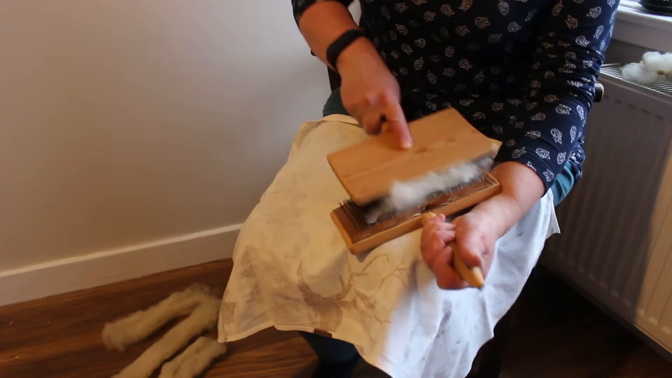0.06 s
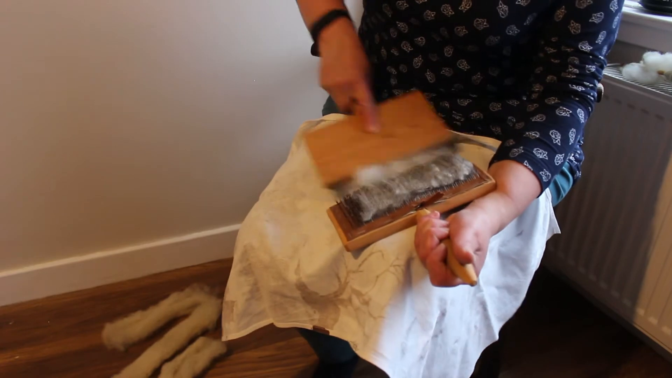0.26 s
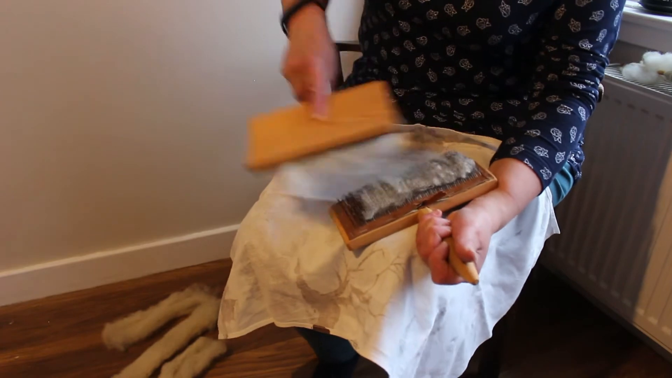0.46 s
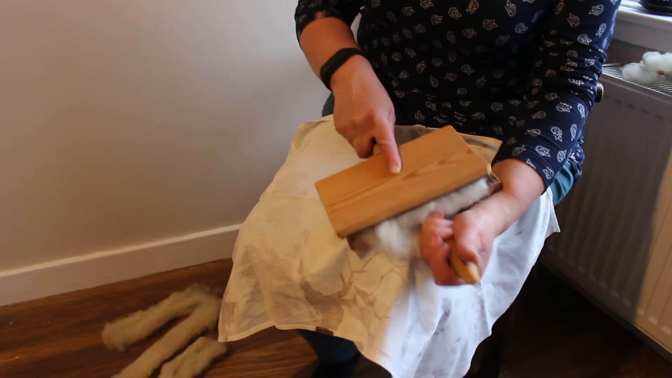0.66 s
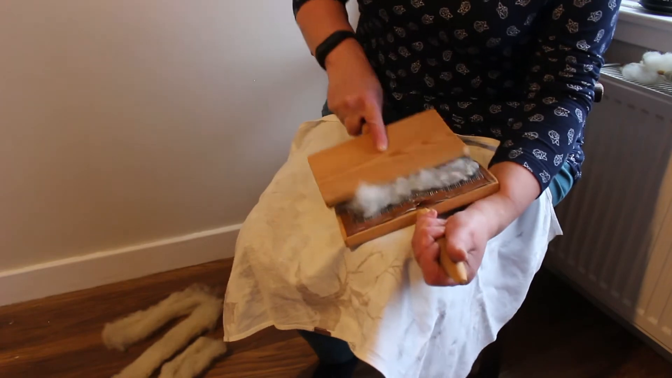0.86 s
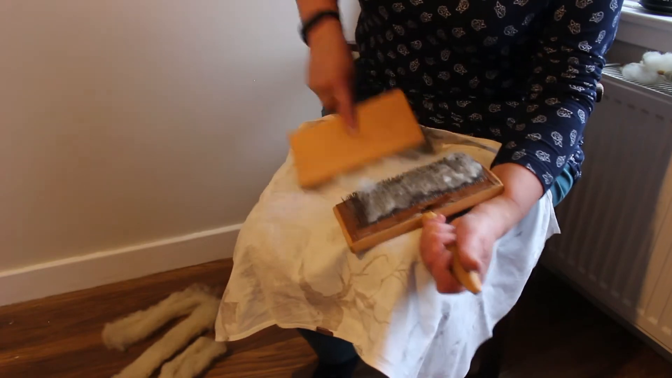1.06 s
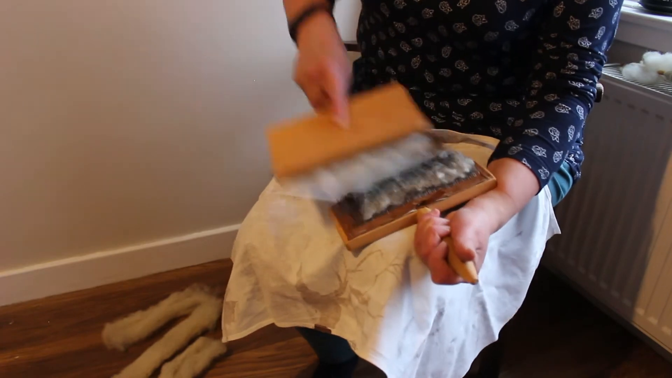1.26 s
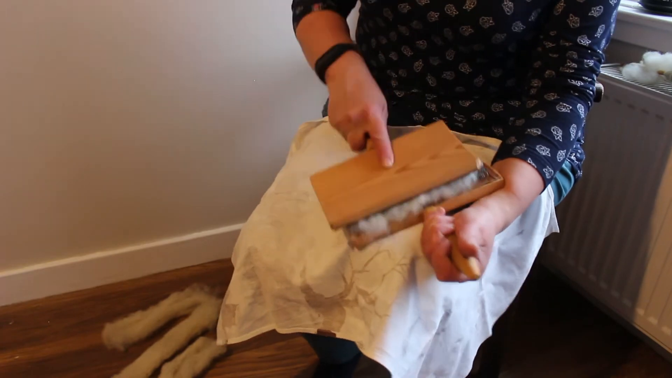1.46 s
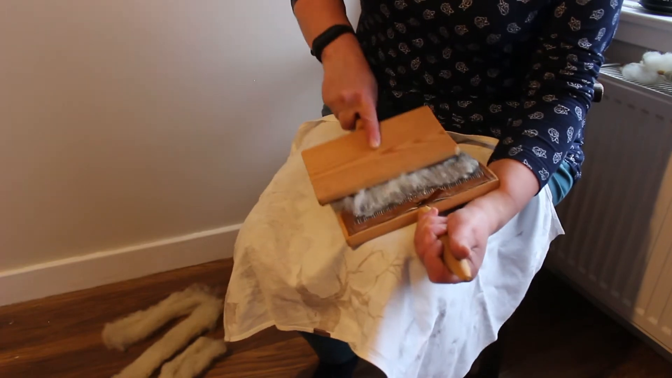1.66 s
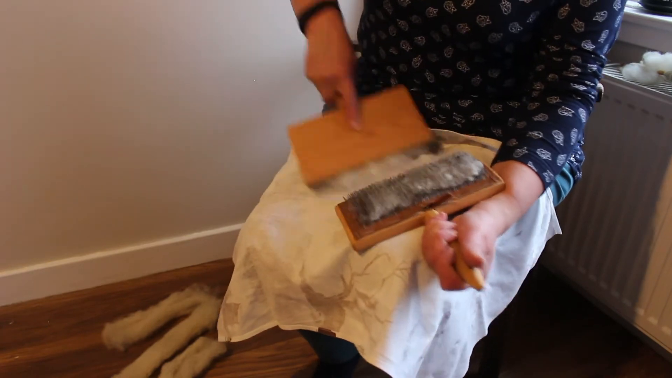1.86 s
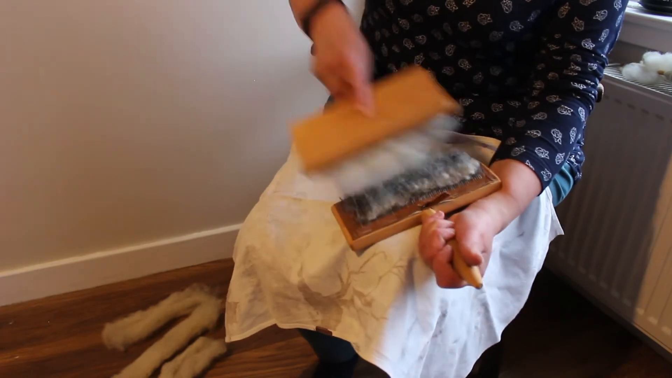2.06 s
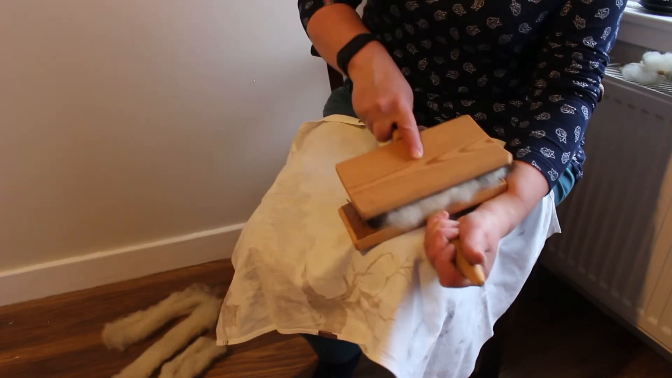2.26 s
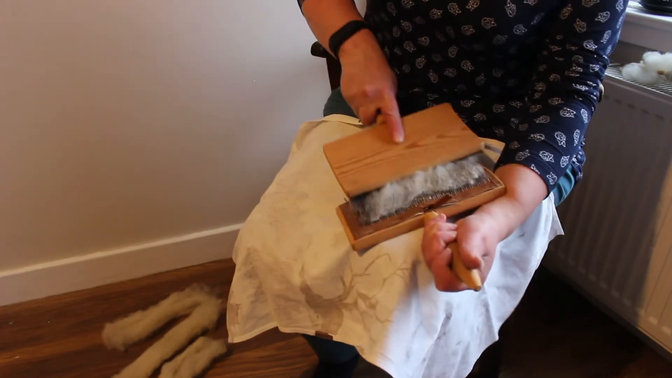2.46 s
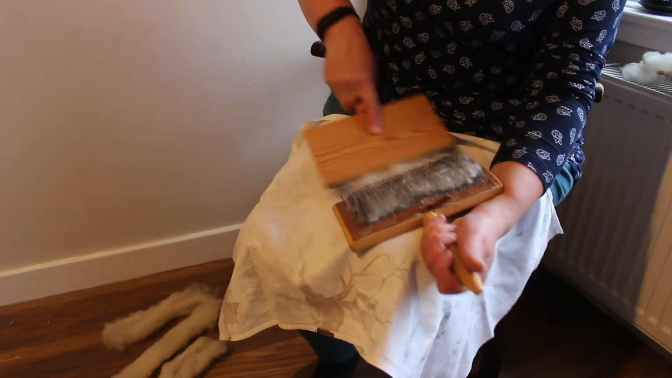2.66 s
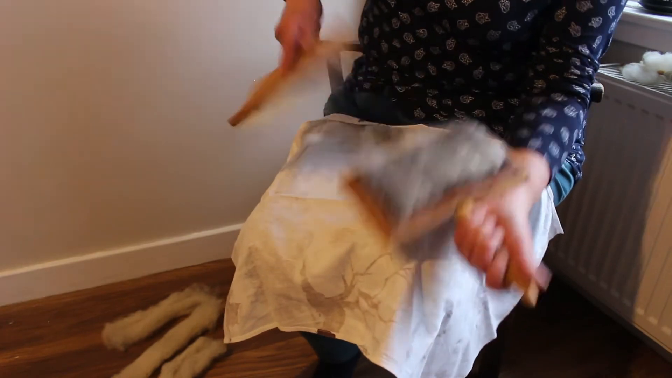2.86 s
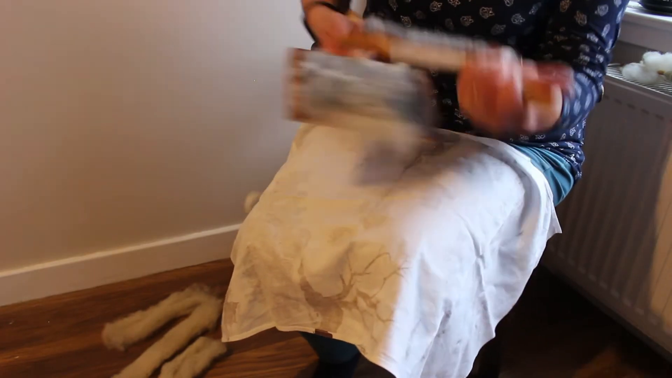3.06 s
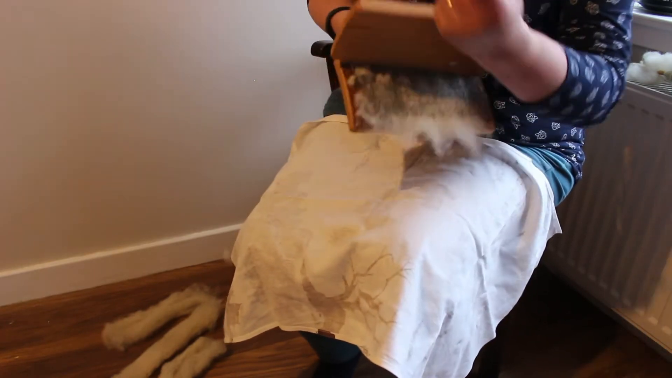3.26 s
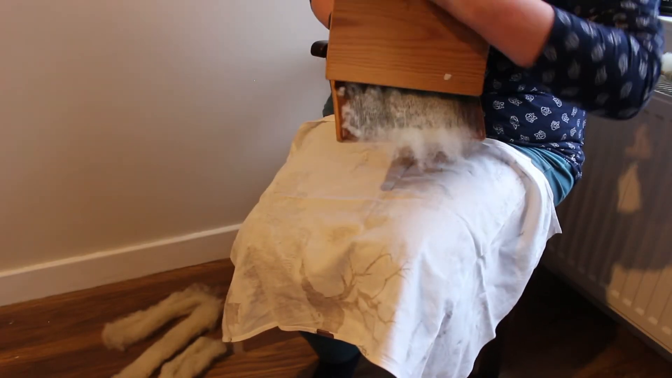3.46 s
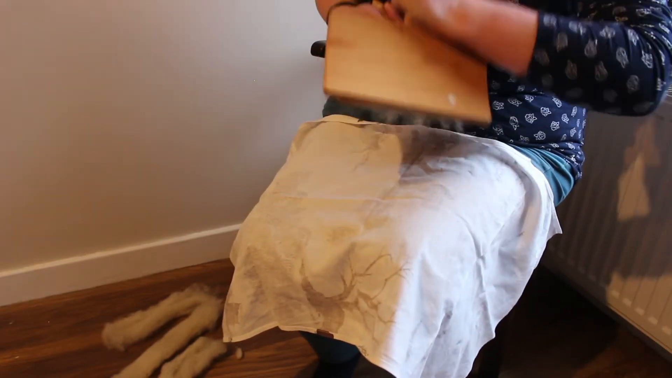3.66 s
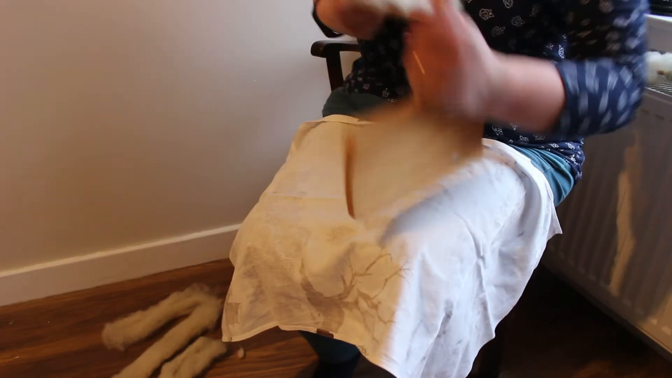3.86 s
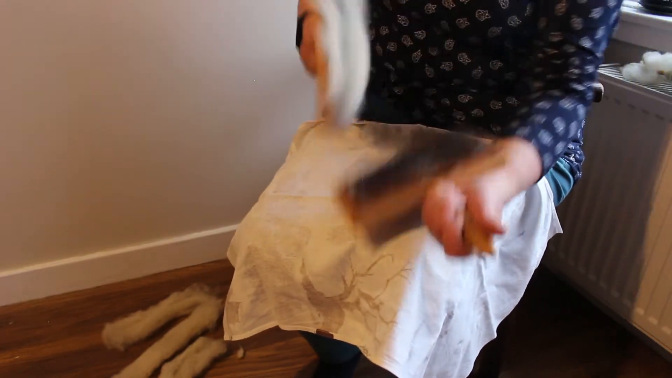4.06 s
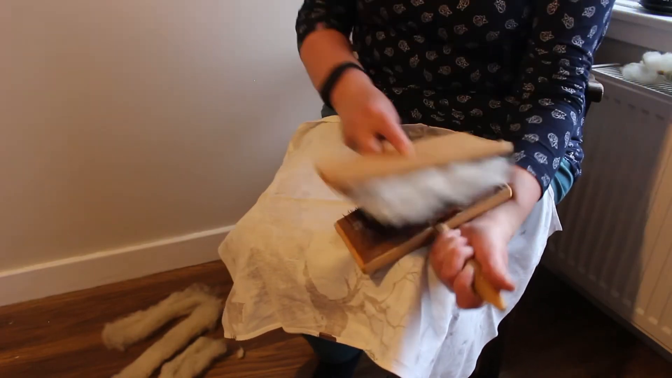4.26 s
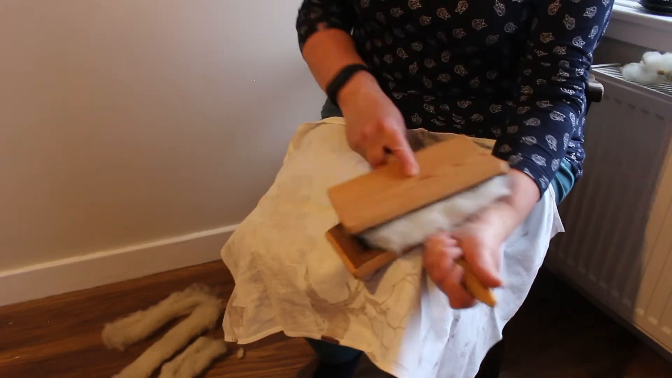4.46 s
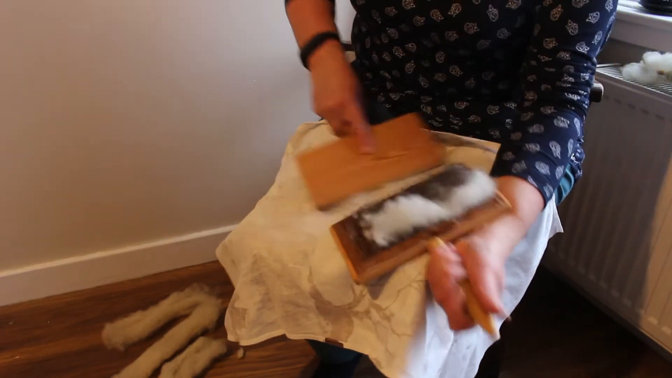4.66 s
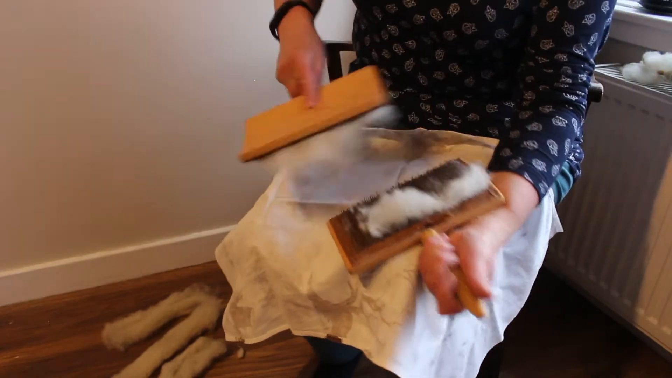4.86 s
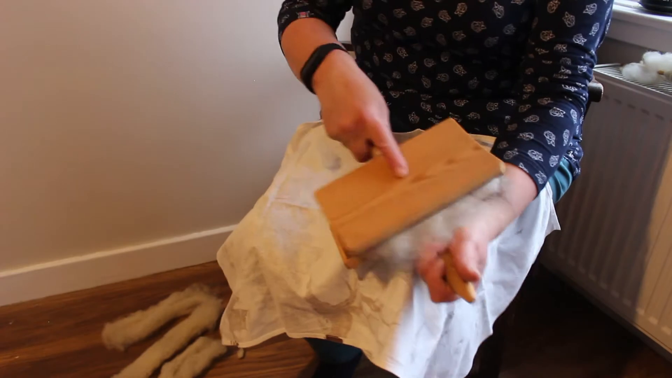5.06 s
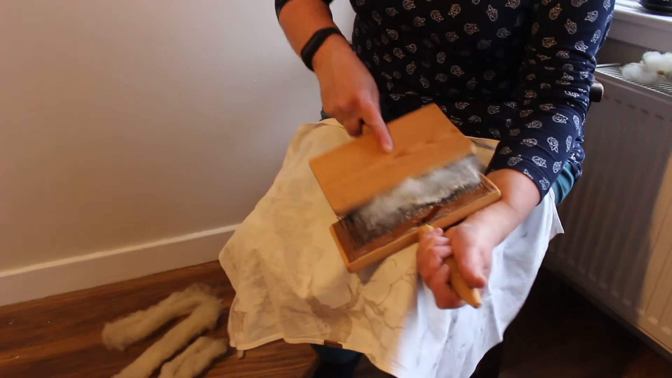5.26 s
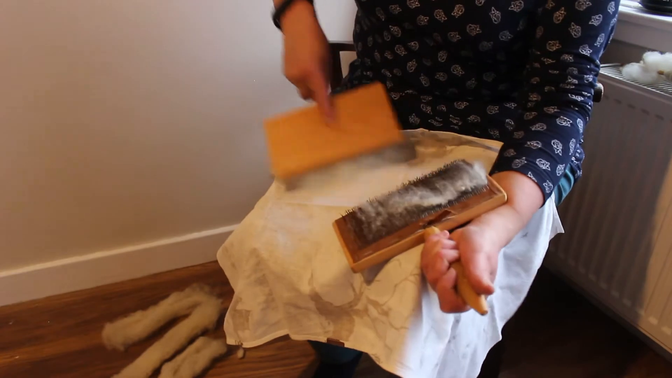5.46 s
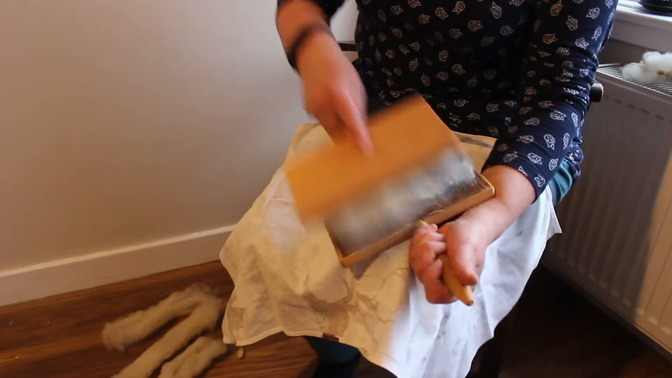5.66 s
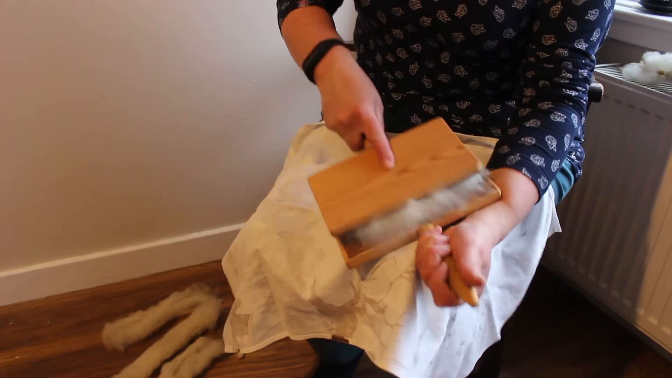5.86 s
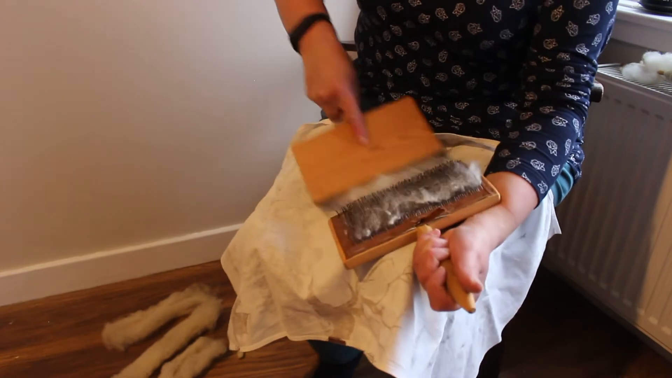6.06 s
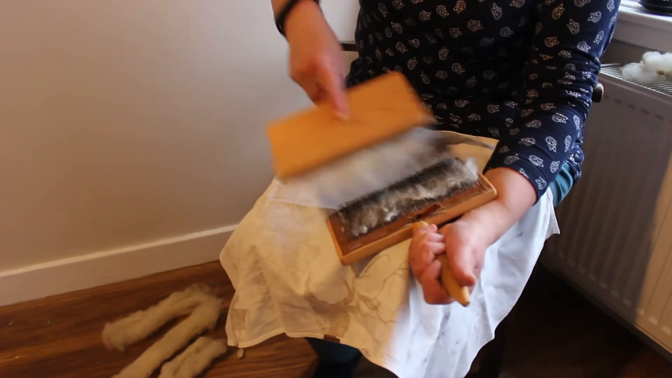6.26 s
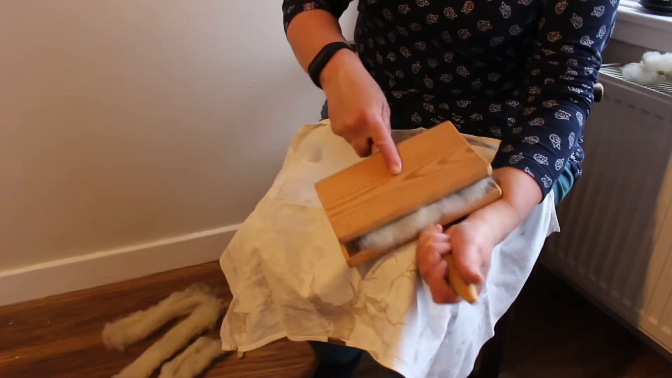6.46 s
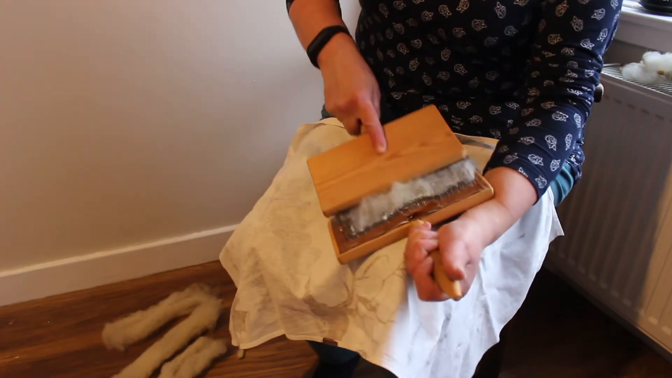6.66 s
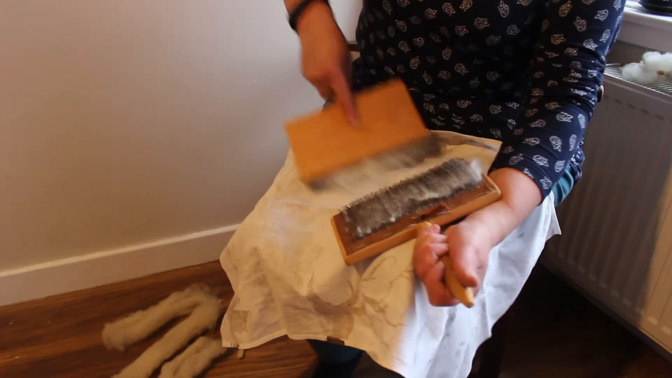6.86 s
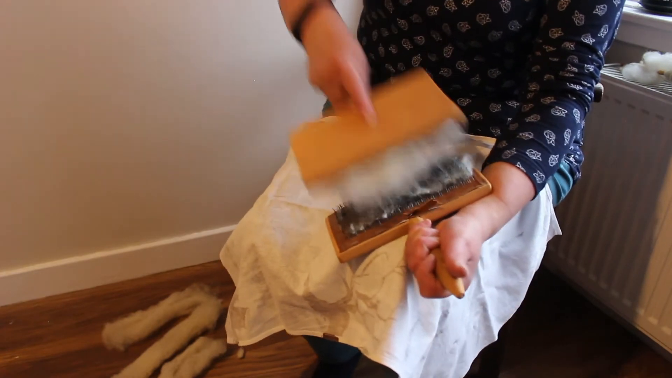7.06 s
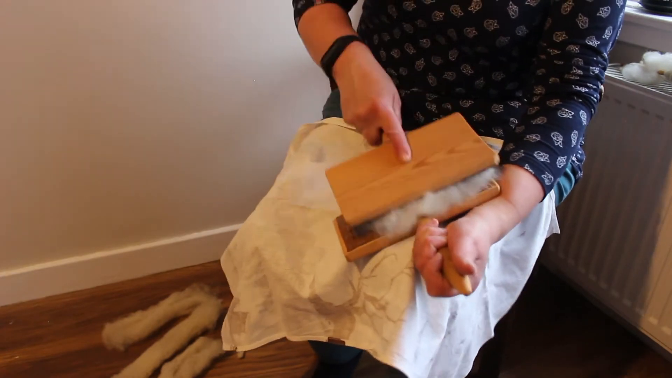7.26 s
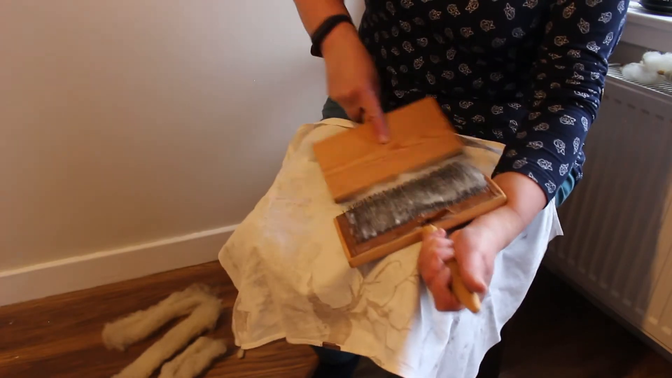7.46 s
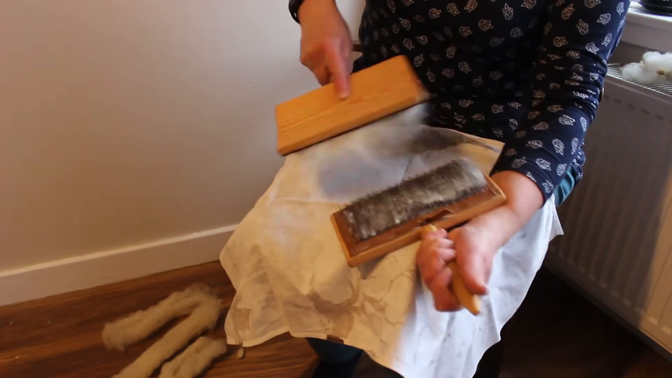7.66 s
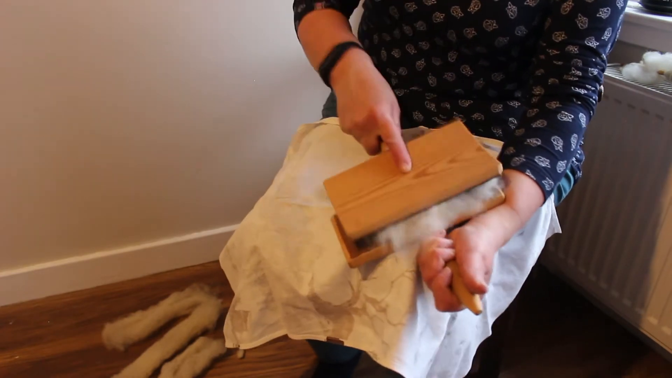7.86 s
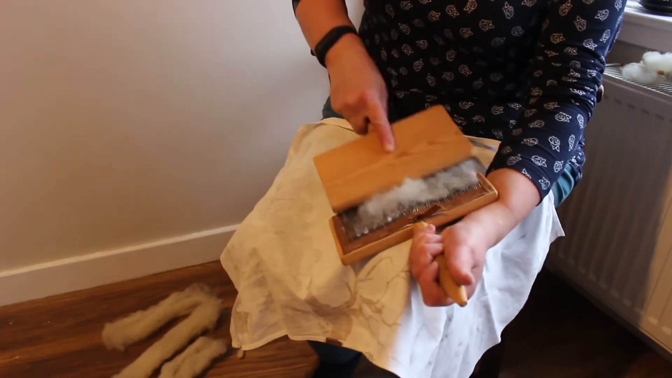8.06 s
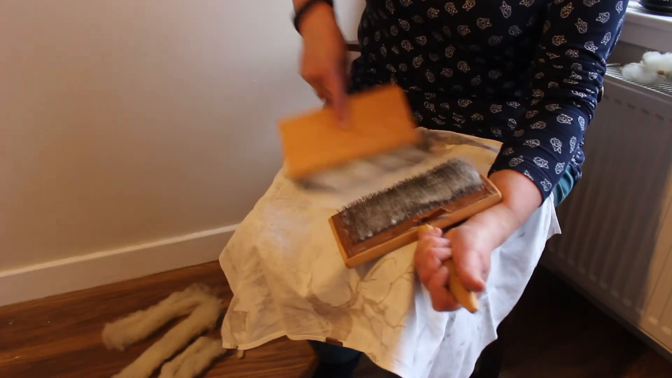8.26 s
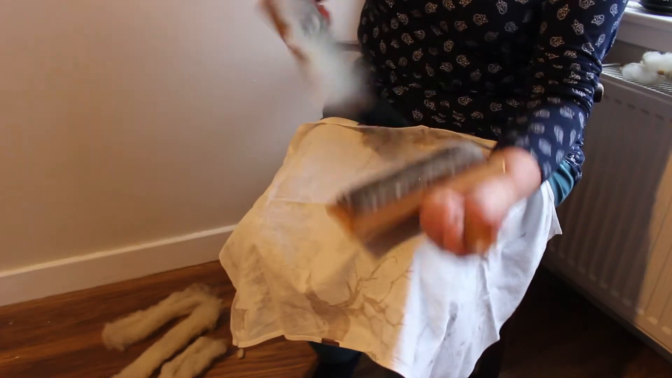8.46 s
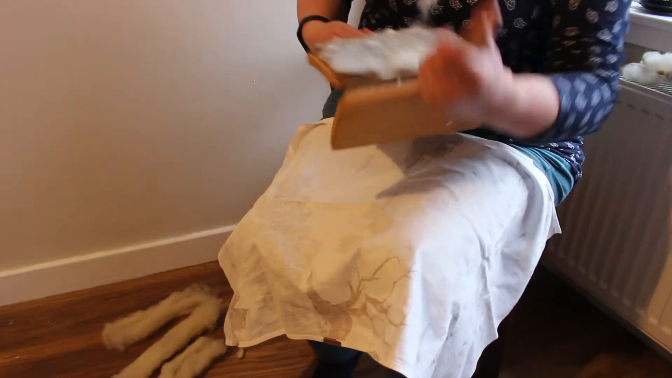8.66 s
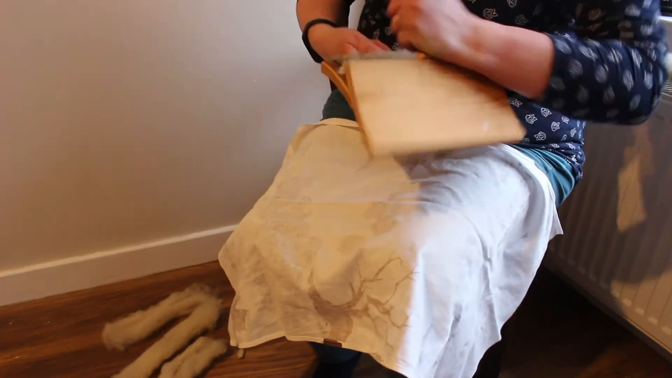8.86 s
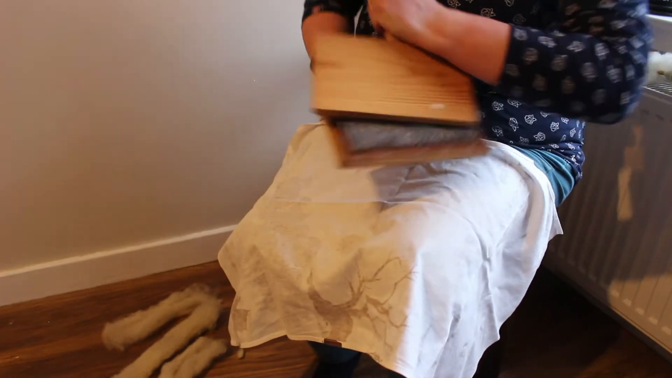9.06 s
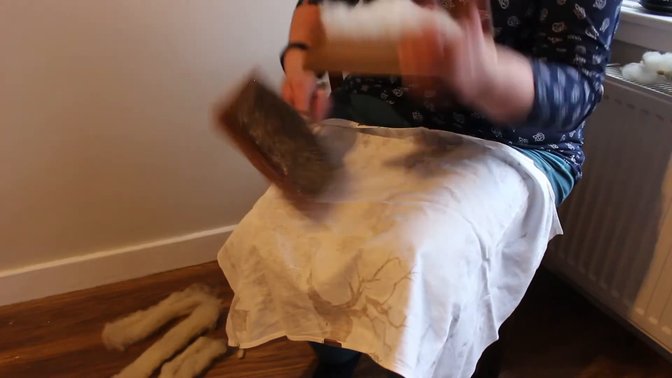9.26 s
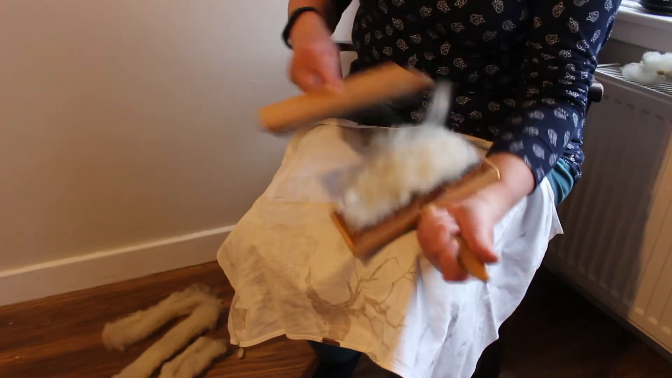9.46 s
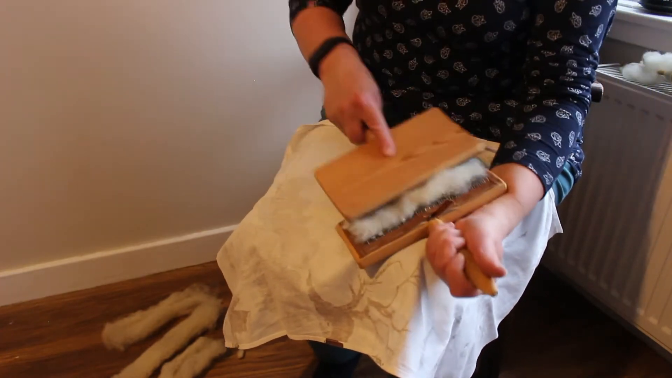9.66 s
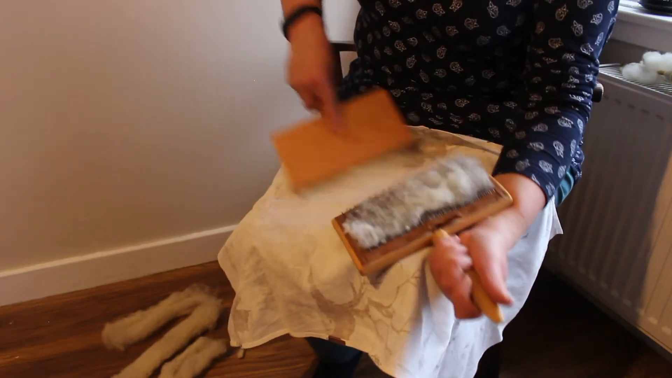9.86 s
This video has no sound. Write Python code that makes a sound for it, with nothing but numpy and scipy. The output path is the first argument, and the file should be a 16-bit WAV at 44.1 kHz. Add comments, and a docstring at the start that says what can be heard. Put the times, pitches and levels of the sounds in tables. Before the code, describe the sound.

Wire-toothed wooden hand carders rasp through wool in slow, separate strokes, with snaps, small wooden knocks and soft lap thumps in a small quiet room.

```python
"""Two wooden hand carders with wire teeth comb wool on a lap, close to one microphone in a small room.
Strokes scrape in dense random ticks and pings, filtered into the wire and ringing the boards as resonances;
the wool then parts more quietly. Noise bursts with a snap crack, low sines thump on the lap and hum after
a card springs free, and gritty sines knock dully. Sparse random taps give the room's short tail;
filtered noise lies underneath as swaying hum and steady hiss."""
import sys
import numpy as np
from scipy import signal
from scipy.io import wavfile
from scipy.ndimage import uniform_filter1d

SR = 44100
rng = np.random.default_rng(int(sys.argv[2]) if len(sys.argv) > 2 else 0)


def output_pcm(signal):
    """Save a mono or channel-first signal as 16-bit PCM at the path in sys.argv[1].

    Samples are clipped to [-1, 1] before scaling.
    """
    pcm = np.clip(np.atleast_2d(signal).T, -1, 1) * 32767
    wavfile.write(sys.argv[1], SR, np.round(pcm).astype(np.int16))


N = 437472  # samples
THUMP_HZ = 45  # low mode of the lap, for tremble and bounces alike


def amp(db):
    """Amplitude factor of a level in dB."""
    return 10 ** (np.asarray(db) / 20)


def evened(x):
    """Scale to an RMS of one."""
    return x / np.sqrt(np.mean(x ** 2) + 1e-20)


def smoothed(x, size):
    """Two running means in a row, each of so many samples."""
    return uniform_filter1d(uniform_filter1d(x, size=size), size=size)


def read(points, hz):
    """Read (f/Hz, value) points along a logarithmic frequency axis."""
    f, value = np.transpose(points)
    return np.interp(np.log(hz + 1), np.log(f + 1), value)


def add(mix, s, sound):
    """Add a sound into the mix in place, from s seconds on."""
    part = mix[round(s * SR):][:len(sound)]
    part += sound[:len(part)]


def colour(x, points):
    """Causal minimum-phase filter whose gain follows (f/Hz, gain/dB) points."""
    hz = abs(np.fft.fftfreq(8192, 1 / SR))
    log_gain = np.log(amp(np.maximum(read(points, hz), -100)))
    phase = -signal.hilbert(log_gain).imag
    taps = np.fft.ifft(np.exp(log_gain + 1j * phase)).real[:4096]
    return signal.oaconvolve(x, taps)[:N]


def ring(x, modes):
    """Sum of resonances (f/Hz, width/Hz, gain/dB) of alternating sign."""
    out = np.zeros(len(x))
    for k, (hz, width, db) in enumerate(modes):
        r = np.exp(-np.pi * width / SR)
        pole = r * np.exp(2j * np.pi * hz / SR)
        mode = 2 * signal.lfilter([1 - r], [1, -pole], x).real
        out += (-1) ** k * amp(db) * mode
    return out


def hush():
    """Room hum, noise below 400 Hz that drifts and sways, under a steady microphone hiss above it."""
    # spectrum of the quiet room before the split: f/Hz, relative level per Hz/dB
    spectrum = [(15, -49), (25, 0), (107, -0.5), (228, -11), (586, -25.5), (1350, -28), (1550, -29.5),
                (1720, -27.5), (6810, -36), (8450, -37.5), (15700, -40)]
    # slow drift of the hum, to which the sway is added: t/s, level/dB
    hum_drift = [(0.0, -46.5), (2.6, -45), (3.1, -49), (4.3, -48.5), (7.0, -48), (7.8, -43), (8.5, -51.5),
                 (9.92, -48)]
    hiss_db, sway_db = -54.5, 0.98
    noise = colour(rng.standard_normal(N), spectrum)
    hum = evened(signal.lfilter(*signal.butter(2, 400, fs=SR), noise))
    hiss = evened(signal.lfilter(*signal.butter(2, 400, "high", fs=SR), noise))
    sway = evened(smoothed(rng.standard_normal(N), 4000))
    hum_db = np.interp(np.arange(N) / SR, *np.transpose(hum_drift))
    return amp(hiss_db) * hiss - amp(hum_db + sway_db * sway) * hum


def controls():
    """Scrape, board, top-board and lap gains over time: the powers of all strokes and grazes add up."""
    # strokes: the teeth creep after the touch, the pull swells, runs on, and the cards come free
    # touch t/s, creep level/dB, pull t/s, full t/s, full level/dB, free t/s, free level/dB,
    # fall/(dB/s), board ring over scrape/dB, upper board modes over that/dB, relative lap shake/dB
    strokes = [(0.0, -32, .018, 0.074, -25, 0.25, -25.5, 165, 2, 0, -36),
               (0.671, -39.5, 0.74, .86, -23.5, 1.028, -25.5, 204, 3.5, 0, -34),
               (1.455, -35, 1.54, 1.593, -24.5, 1.866, -32.5, 165, 4.5, -1.5, -38.5),
               (2.269, -35.5, 2.323, 2.41, -23, 2.678, -35.5, 115, 4, -2, -38),
               (3.37, -51, 3.372, 3.401, -36.5, 3.475, -35, 140, -11, 4, -62),
               (3.548, -36, 3.636, 3.692, -21.5, 3.758, -28, 140, -5.5, 3.5, -55),
               (4.413, -39.5, 4.47, 4.652, -19.5, 4.73, -27.5, 200, 0, -0.5, -34.5),
               (5.159, -42, 5.16, 5.19, -32.5, 5.4, -31.5, 178, 2, -2, -46),
               (5.817, -39, 5.81, 6, -26.5, 6.04, -22.5, 169, 1.5, -1, -38),
               (6.489, -36, 6.524, 6.63, -24, 6.827, -29, 170, 4.5, -5.5, -35),
               (7.238, -36.5, 7.31, 7.355, -23, 7.516, -27, 211, 2.5, -3, -37.5),
               (7.919, -37.5, 7.9, 8.1, -25.5, 8.19, -23.5, 233, 2.5, -3, -32.5),
               (8.9, -34, 8.91, 8.962, -26.5, 9.16, -27, 204, -7, 4.5, -58),
               (9.657, -49.5, 9.725, 9.8, -34, 9.86, -36, 145, 3.5, -8, -37)]
    # short grazes of the teeth: start t/s, rise/s, peak level/dB, fall/(dB/s), board ring over scrape/dB
    grazes = [(.71, .03, -32, 250, 2.5), (1.101, 0.036, -25.5, 235, -17), (2.664, 0.00096, -32.5, 98, -5),
              (3.293, 0.00088, -34.5, 280, -14), (3.9, 0.23, -53.5, 100, -2),
              (4.203, 0.015, -43.5, 220, -8), (4.312, 0.0046, -37, 200, -12),
              (4.745, 0.024, -26.5, 246, -8), (4.876, 0.086, -45, 108, -20), (7.536, 0.053, -27, 217, -18),
              (8.25, 0.018, -42, 82, -9), (8.487, .024, -52, 59, -19), (8.766, 0.032, -32, 185, -5.5),
              (9.54, .01, -46.5, 150, -24), (9.623, 0.0011, -44, 300, -18)]
    swell_shape, sag_shape = 0.77, 0.85  # exponents: the pull swells fast at first
    graze_rise_db = 10.5  # a graze starts this far under its peak
    wool_db, wool_fall_db_per_s = -25, 65  # fibres part quietly after the teeth are free
    board_fade_db_per_s, board_fade_most_db = 30, 12  # boards ring less as the cards slide apart
    creep_ring_db = -3  # creeping teeth shake the boards less than a full pull
    uneven_db = .8  # RMS: the wool tears unevenly

    power = np.zeros((4, N))
    for touch, creep_db, pull, full, full_db, free, free_db, fall, board_db, top_db, lap_db in strokes:
        t = np.arange(touch, free + .5, 1 / SR)
        swell = np.clip((t - pull) / max(full - pull, .005), 0, 1) ** swell_shape
        sag = np.clip((t - full) / (free - full), 0, 1) ** sag_shape
        after = np.maximum(t - free, 0)
        teeth_db = creep_db + (full_db - creep_db) * swell + (free_db - full_db) * sag - fall * after
        wool = (t > free) * amp(free_db + wool_db - wool_fall_db_per_s * after)
        scrape = np.hypot(amp(teeth_db), wool)
        fade_db = np.clip(board_fade_db_per_s * (t - full), 0, board_fade_most_db)
        board = scrape * amp(board_db - fade_db + creep_ring_db * (1 - swell))
        shake = amp(lap_db - fall * after)
        for row, gain in zip(power, (scrape, board, board * amp(top_db), shake)):
            add(row, touch, gain ** 2)

    for start, rise, db, fall, board_db in grazes:
        t = np.arange(0, rise + .5, 1 / SR) - rise  # zero at the peak
        scrape = amp(db + np.where(t < 0, graze_rise_db * t / max(rise, .001), -fall * t))
        add(power[0], start, scrape ** 2)
        for row in power[1:3]:
            add(row, start, (scrape * amp(board_db)) ** 2)

    uneven = evened(smoothed(rng.standard_normal(N), 1000))
    return np.sqrt(power) * amp(uneven_db * uneven)


def ticks(per_s, spread_db, clump_db):
    """Teeth slipping past each other: dense clicks of uneven size that come in clumps."""
    size = amp(spread_db * np.minimum(rng.exponential(1, N), 5)) * rng.choice([-1., 1.], N)
    clumps = evened(smoothed(rng.standard_normal(N), 200))
    struck = rng.random(N) < per_s / SR
    return evened(size * struck * amp(clump_db * clumps))


def pings(per_s, spread_db, cycles, count=20):
    """Released teeth quiver for a few cycles, each group of teeth at its own pitch."""
    struck = rng.random(N) < per_s / SR
    size = amp(spread_db * np.minimum(rng.exponential(1, N), 4)) * struck
    group = rng.integers(0, count, N)
    t = np.arange(1000) / SR
    out = np.zeros(N)
    for k, hz in enumerate(np.geomspace(700, 7000, count)):
        quiver = np.sin(2 * np.pi * hz * t) * np.exp(-t * hz / cycles) * (1 - np.exp(-t * hz))
        quiver /= np.linalg.norm(quiver)
        out += hz ** .5 * signal.oaconvolve(size * (group == k), quiver)[:N]
    return evened(out)


def cards(scrape, board, top):
    """Slips at the tooth tips sound in the wire; jolts at the tooth roots shake the wooden backs."""
    # teeth, cards on the lap: f/Hz, relative level per Hz/dB
    wire_on_lap = [(90, -23), (150, -9), (265, -4.5), (375, -11), (450, -9), (750, -4.5), (1280, -4),
                   (1900, -5), (3200, -6.5), (4500, -5.5), (5700, -8.5), (7500, -20), (11100, -33.5),
                   (15700, -27)]
    # teeth, cards in the air: f/Hz, relative level per Hz/dB
    wire_in_air = [(90, -42), (150, -7.5), (480, -18), (850, -4), (1200, -12.5), (1500, -4.5), (1850, -9),
                   (2400, -8), (3500, -7.5), (4400, -5), (5700, -7.5), (7500, -18.5), (11300, -37),
                   (15700, -27)]
    # cards held up off the lap to pass the wool over: from t/s, to t/s
    lifted = [(3.2, 4.17), (8.7, 9.5)]
    # resonances of the wooden backs: f/Hz, width/Hz, relative gain/dB
    modes = [(550, 79, -9.5), (860, 140, -6), (1109, 86, 1.5), (1264, 153, -0.5), (1453, 140, -6.5),
             (1564, 117, -8.5), (1890, 150, -1.5), (2217, 190, -8.5), (2550, 200, -9.5)]
    upper = 6  # modes from this index up belong to the top card and depend on how it is gripped
    tips = ticks(12000., spread_db=2.5, clump_db=-1.5)
    tips = tips + .55 * pings(5000., spread_db=2.5, cycles=2.75)
    roots = ticks(6000., spread_db=3.0, clump_db=1.5)
    snap, knock = cracks()

    t = np.arange(N) / SR
    up = sum((t > a) & (t < b) for a, b in lifted)
    wire = 0
    for share, points in ((1 - up, wire_on_lap), (up, wire_in_air)):
        wire = wire + colour((tips * scrape + snap) * share, points) / colour(tips, points).std()

    wood = ring(roots * board + knock, modes[:upper])
    wood += ring(roots * top + amp(-3.5) * knock, modes[upper:])
    return wire + amp(-2.0) * wood / ring(roots, modes).std()


def lap_tremble(shake):
    """A soft mass on the knees: noise through a low mode, kept trembling by the pull."""
    once = ring(rng.standard_normal(N), [(THUMP_HZ, 11.8, 0)])
    return amp(-1.0) * shake * evened(ring(once, [(THUMP_HZ, 16, 0)]))


def room(x):
    """Sparse taps of random sign, one in every 20 samples, each band dying at its own speed."""
    # decay of the small room: f/Hz, t60/s
    decay = [(200, 0.87), (800, 0.25), (2000, 0.37), (5500, 0.16), (12000, 0.18)]
    taps = np.zeros(SR)
    at = np.arange(300, SR - 20, 20)  # none in the first 300 samples
    taps[at + rng.integers(0, 20, len(at))] = rng.choice([-1., 1.], len(at))
    hz, t, bands = signal.stft(taps, SR, nperseg=256)
    dying = amp(-60 * t / read(decay, hz)[:, None])
    tail = signal.istft(bands * dying, SR, nperseg=256)[1]
    return signal.fftconvolve(x, tail / np.linalg.norm(tail))[:N]


def low_bounces(events, hz, t60):
    """Decaying low sines with a soft onset, each starting 8 ms ahead of its listed time."""
    out = np.zeros(N)
    t = np.arange(0, .4, 1 / SR)
    onset = 1 - np.exp(-t / 0.022)
    for s, db in events:
        add(out, s - .008, -amp(db - 2.5 - 60 * t / t60) * np.sin(2 * np.pi * hz * t) * onset)
    return out


def thumps():
    """The lower card bounces on the lap, whose low mode dies away."""
    # bounces: t/s, relative level/dB
    bounces = [(.01, -18), (.675, -13), (1.456, -12), (2.263, -18.5), (4.198, -9.5), (4.309, -12.5),
               (4.426, -16), (5.175, -26), (5.818, -13.5), (6.493, -16.5), (7.24, -27), (7.924, -12.5),
               (9.538, -16.5), (9.62, -18)]
    return low_bounces(bounces, THUMP_HZ, t60=0.38)


def springs():
    """The lifted card springs free and its frame hums on as a decaying low tone."""
    # releases: t/s, relative level/dB
    releases = [(0.489, -32), (1.22, -34.5), (2.025, -27.5), (4.829, -24), (5.598, -30), (7.017, -32),
                (7.64, -23)]
    return low_bounces(releases, hz=78.9, t60=0.44)


def cracks():
    """Many teeth seat at once: a short rush and one snap that twangs the wire and knocks the boards."""
    # teeth meeting or catching at once: t/s, relative level/dB, relative board ring/dB,
    # twang f/Hz, twang gain/dB, rise/s, t60/s
    seatings = [(.669, -11, -18, 3620, 1, 0.0041, 0.034), (.799, -12, -15, 1850, 11.5, .0033, 0.061),
                (1.102, -19.5, -12, 3620, 14, .0023, .1), (1.118, -27, -12, 3520, 14, .005, 0.088),
                (1.135, -13.5, -5, 3420, 16, 0.0051, 0.13), (1.450, -15, -18, 3250, -5, 0.0077, .081),
                (2.262, -14, 5.5, 5140, 16, 0.0044, 0.02), (2.665, -12.5, -18, 4000, 0, 0.0016, 0.045),
                (3.289, -19.5, -11, 5560, 3, .0051, .029), (3.791, -20, 4, 4570, 5, 0.0018, 0.048),
                (4.199, -25.5, -7, 3120, 5, 0.0098, 0.058), (4.309, -16.5, 6, 5200, 11, 0.0049, 0.017),
                (4.414, -16, -14, 4750, 7, 0.0086, 0.085), (4.780, -14, -11, 2660, 18, 0.0061, 0.041),
                (5.811, -10.5, -11, 2550, -2, 0.0076, 0.076), (6.486, -12.5, -3, 4100, 2, 0.0041, .04),
                (7.235, -16.5, -5, 4060, 4, 0.0059, 0.085), (7.572, -15, -17, 3490, 16, 0.0037, 0.2),
                (7.631, -17.5, -13, 2480, 8, .0023, 0.033), (7.916, -12, -3, 2730, 2, .012, 0.056),
                (8.486, -39.5, 7, 2590, -4, .001, 0.027), (8.7614, -20.5, 3, 5270, 22, 0.0011, 0.026),
                (8.899, -27, -6, 2900, -3, .001, .045), (9.548, -40, -13, 3060, 15, 0.0044, 0.07),
                (9.619, -25, -1, 4260, 5, .004, 0.026), (9.656, -34, -1, 4740, 15, .002, 0.039)]
    snap_loss_db_per_s = 2000  # per second of rise: the slower the teeth seat, the weaker the snap
    twang_damping = 16.7  # width Hz x t60 s: long cracks twang on a narrower pitch
    blow_db, blow_s = -7.5, .0001  # the blunt blow that a crack passes on to the boards
    wire, wood = np.zeros(N), np.zeros(N)
    t = np.arange(-.01, .12, 1 / SR)
    rush = rng.standard_normal((len(seatings), len(t)))
    for (s, db, board_db, hz, twang_db, rise, t60), noise in zip(seatings, rush):
        t60 = max(t60, .01)
        # the first teeth touch shortly before the cards seat; the rush lies below its peaks
        burst = noise * amp(db - 9.0 + np.where(t < 0, 22 * t / max(rise, 5e-4), -60 * t / t60))
        burst += amp(db - snap_loss_db_per_s * rise) * np.exp(-(t / 6e-5) ** 2)
        twang = ring(burst, [(hz, twang_damping / t60, 0)])
        blow = amp(db + blow_db) * np.exp(-(t / blow_s) ** 2)
        add(wire, s + t[0], burst + amp(twang_db) * twang)
        add(wood, s + t[0], (burst + blow) * amp(board_db))
    # seated teeth are damped by wool: little top end
    wire = signal.lfilter(*signal.butter(1, 7000, fs=SR), wire)
    # the cracks knock the boards without low boom
    wood = signal.lfilter(*signal.butter(2, 800, "high", fs=SR), wood)
    return wire, wood


def knocks():
    """Dull knocks of wood and cloth: a decaying sine roughened by smoothed noise."""
    # knocks: t/s, relative level/dB, f/Hz
    blows = [(1.088, -29, 80), (1.116, -25.5, 64), (2.557, -42, 90.5), (3.286, -31.5, 245),
             (4.698, -40, 61), (4.725, -30, 62), (4.772, -30.5, 71), (7.557, -29.5, 115), (7.585, -29, 86),
             (8.76, -31, 190), (9.532, -40.5, 90.5)]
    out = np.zeros(N)
    t = np.arange(0, .4, 1 / SR)
    rattle = smoothed(rng.standard_normal((len(blows), len(t))), 40)
    for (s, db, hz), grit in zip(blows, rattle):
        body = np.sin(2 * np.pi * hz * t) + 0.7 * evened(grit)
        fall = amp(db + 7.5 - 60 * t / 0.1)  # t60 of 0.1 s
        add(out, s + 0.00075, fall * body * (1 - np.exp(-t / 0.0031)))
    return out


def scene():
    """The cards close by with their room tail, the sounds of the lap, and the quiet room."""
    scrape, board, top, shake = controls()
    near = cards(scrape, board, top)
    low = lap_tremble(shake) + thumps() + springs() + knocks()
    mono = near + amp(-11.5) * room(near) + low + hush()
    return np.array([mono, mono])


def record(dry):
    """One microphone feeds both channels, which differ only by a faint white hiss; then the band limit."""
    fuzz_db, edge_hz = -63, 15750
    fuzz = amp(fuzz_db) * rng.standard_normal(N)
    both = dry + np.array([fuzz, -fuzz])
    low_pass = signal.firwin(1023, edge_hz, window=("kaiser", 10), fs=SR)
    return signal.oaconvolve(both, low_pass[None], "same")


dry = scene()
out = record(dry)
output_pcm(out)
```